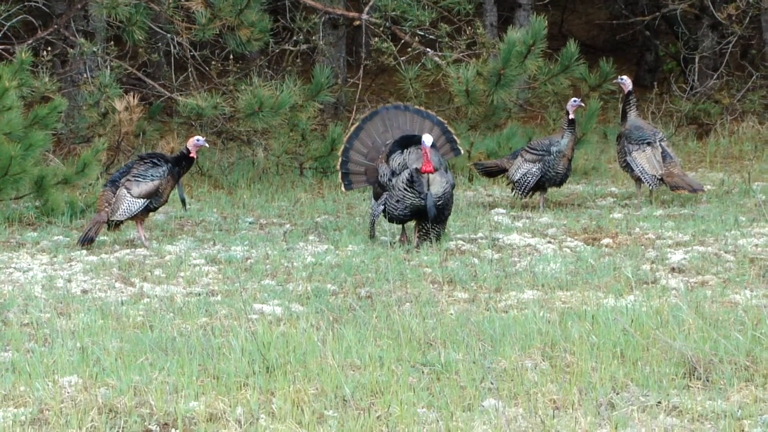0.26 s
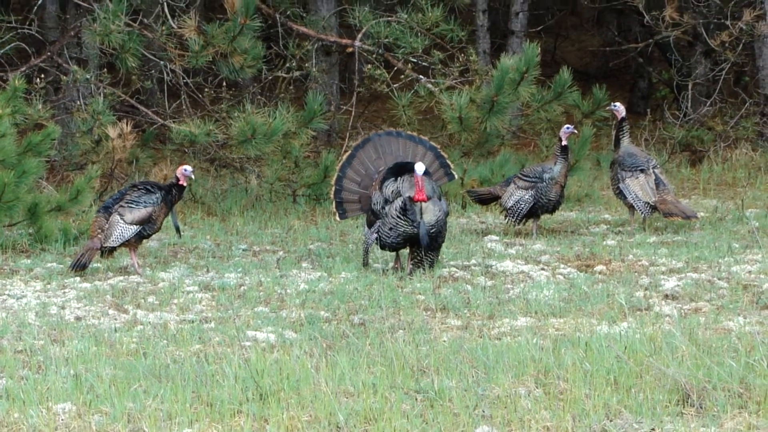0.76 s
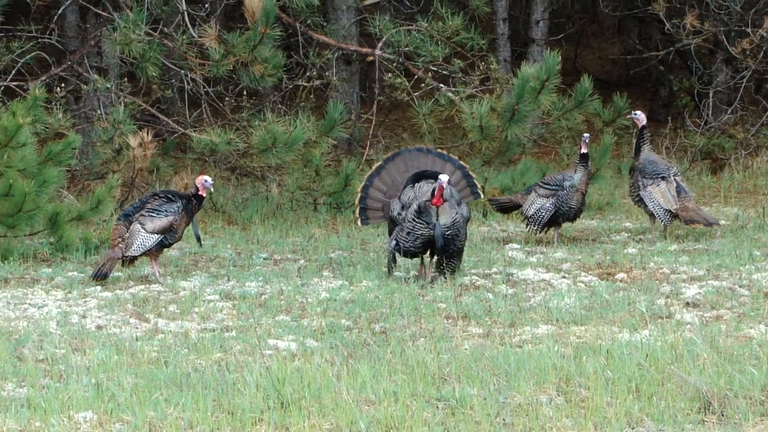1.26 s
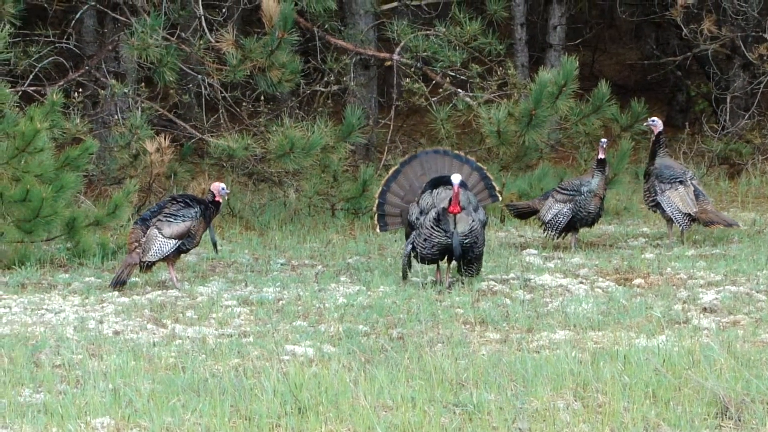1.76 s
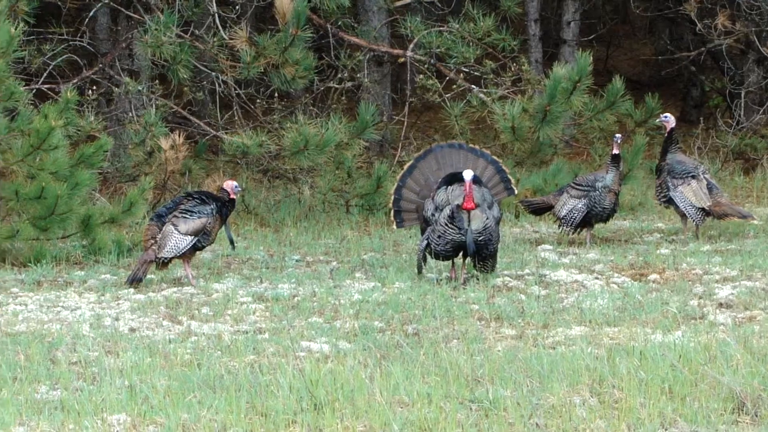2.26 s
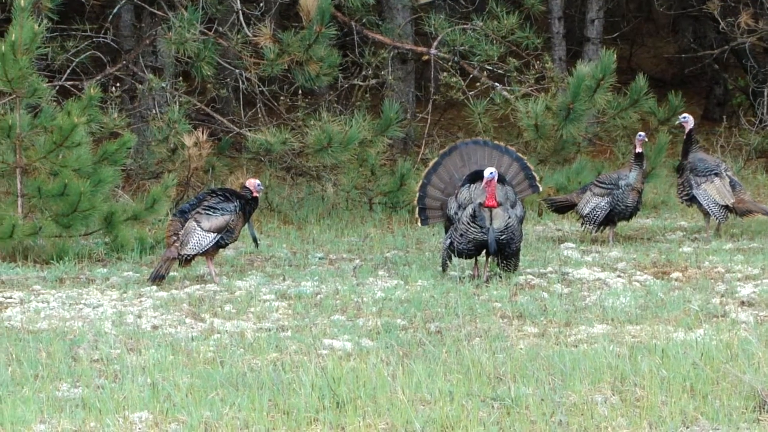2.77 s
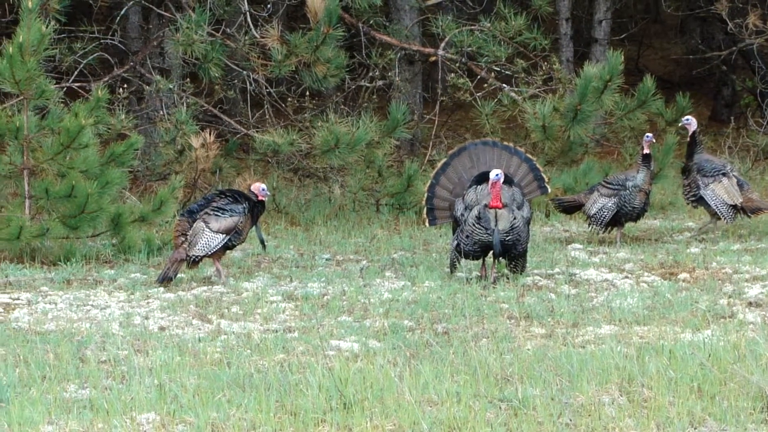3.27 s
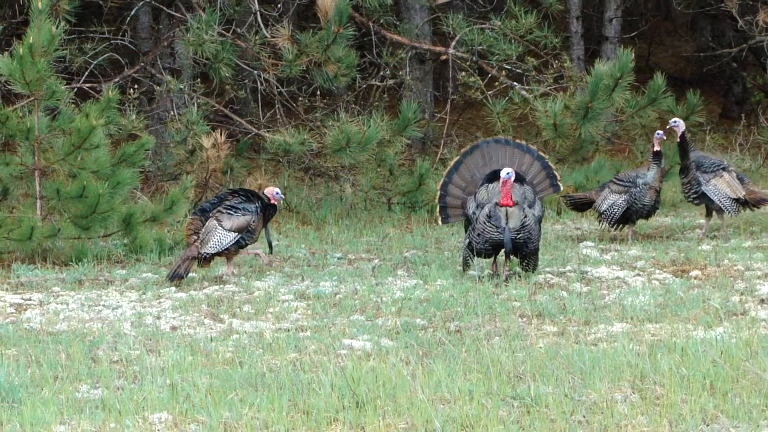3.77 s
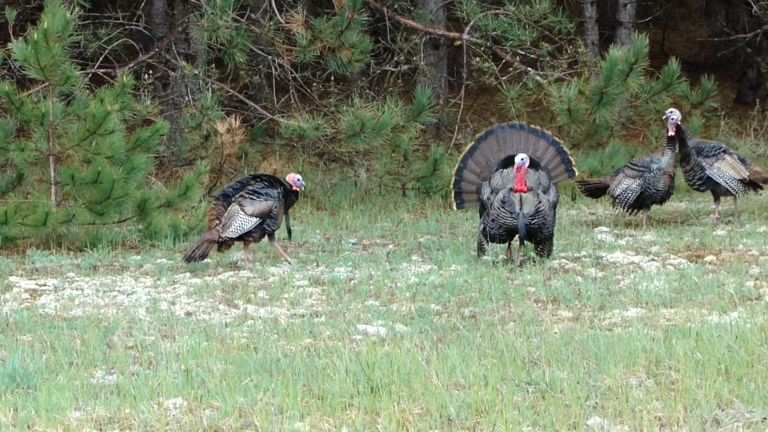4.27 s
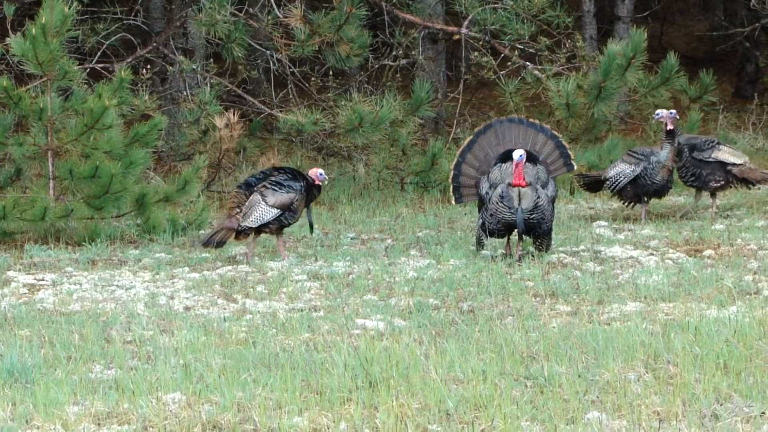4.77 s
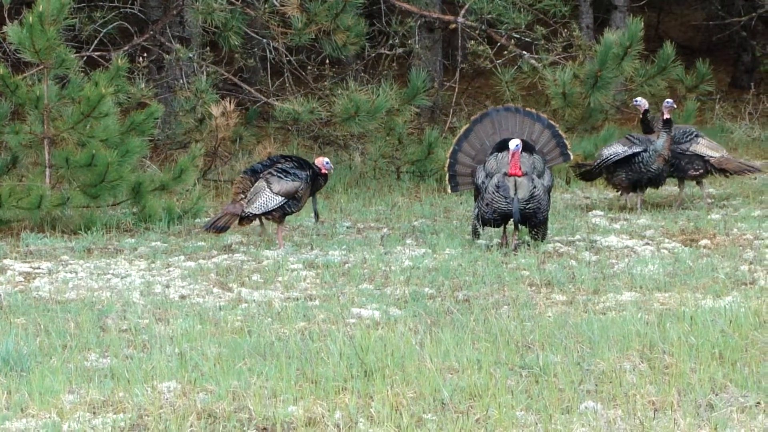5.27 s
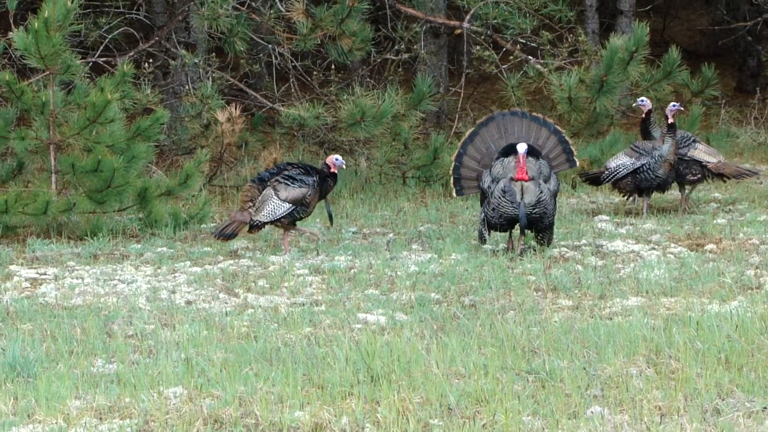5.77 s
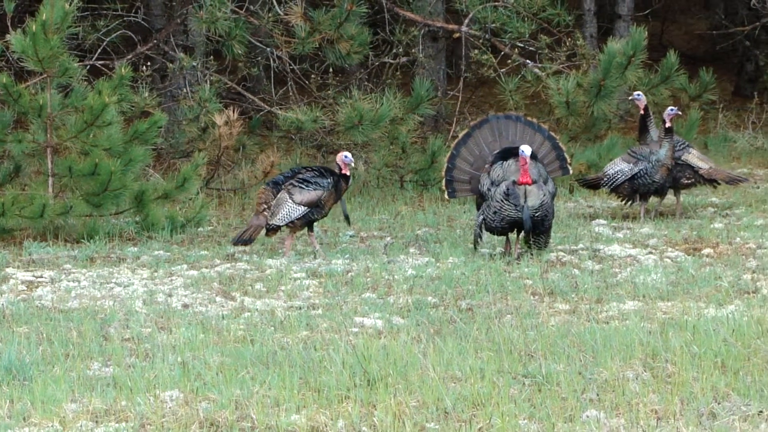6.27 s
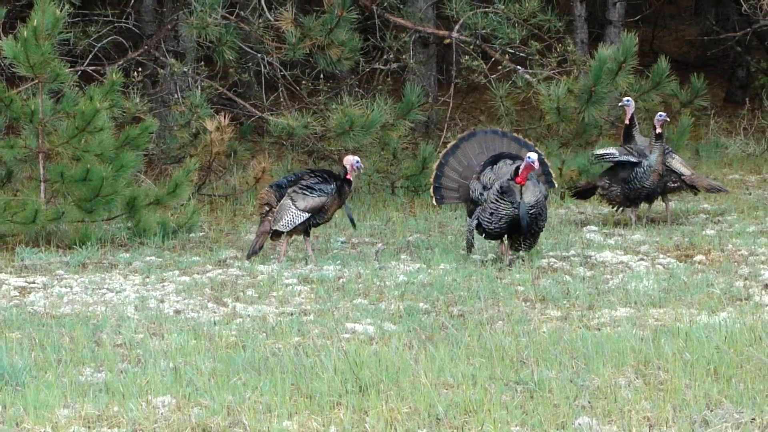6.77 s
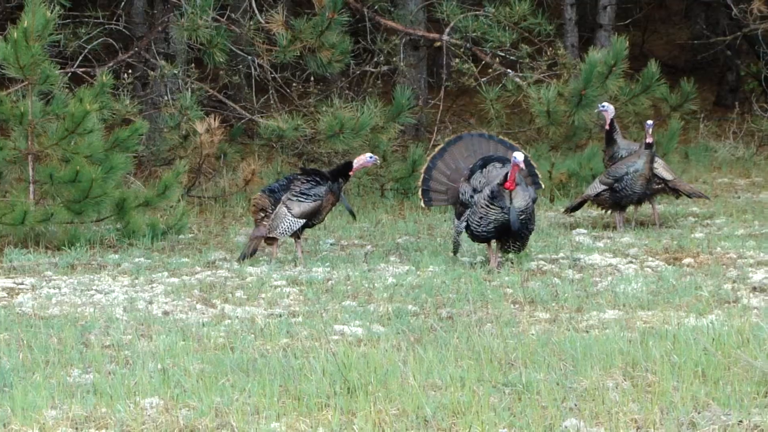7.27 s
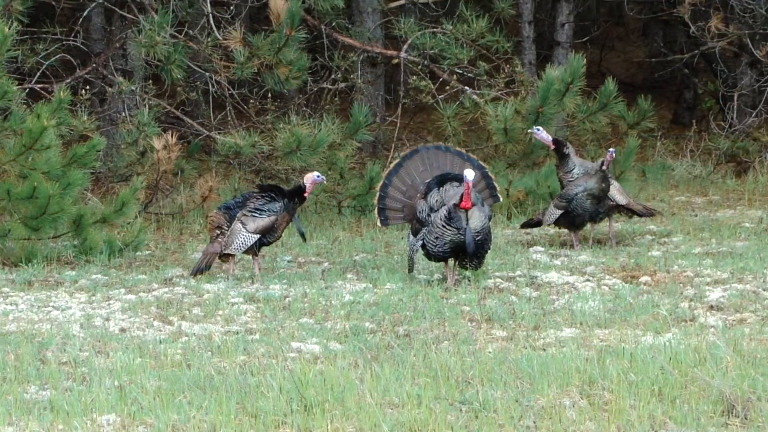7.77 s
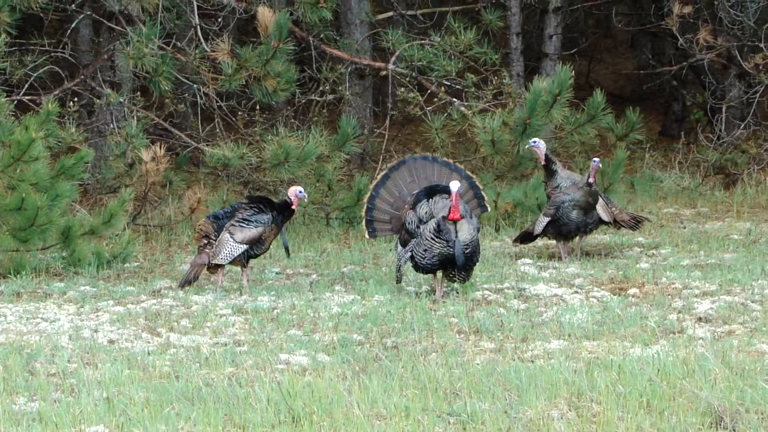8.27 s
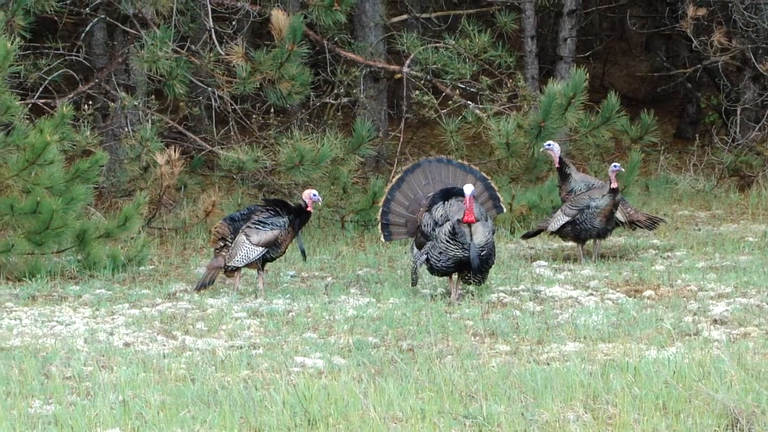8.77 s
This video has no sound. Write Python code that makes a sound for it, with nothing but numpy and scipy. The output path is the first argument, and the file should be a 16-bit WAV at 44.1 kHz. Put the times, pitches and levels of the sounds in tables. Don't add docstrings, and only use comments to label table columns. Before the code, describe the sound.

Wild turkeys outdoors: rattling gobbles and distant raspy yelps, small ticks, then sharp close hen cuts answered by a long rolling gobble.

```python
import sys
import numpy as np
from scipy import signal
from scipy.fft import rfft, irfft, next_fast_len
from scipy.io import wavfile
from scipy.ndimage import uniform_filter1d

SR = 44100
rng = np.random.default_rng(int(sys.argv[2]) if len(sys.argv) > 2 else 0)


def boost(x):
    u = np.asarray(x, float) / 20
    return 10 ** u


def transcribe(u):
    v = np.clip(np.atleast_2d(u).T, -1, 1)
    q = np.round(v * 32767).astype(np.int16)
    wavfile.write(sys.argv[1], SR, q)


N = 398223

# frequency_hz, density_db
AIR_COLOUR = [(24, -12), (40, -17), (64, -26.5), (140, -16), (236, -5.5), (388, -8), (426, -2), (458, -8.5),
              (847, -8), (1050, -11.5), (4770, -30.5), (11400, -45), (14900, -63), (22000, -120)]
# time_s, level_db
AIR_SWELL = [(0, 3), (3.9, 2.5), (4.6, 3), (5.3, 3), (9, 3.5)]
AIR_DB = -43.5
HUM_HZ, HUM_DB = 427, -55

# frequency_hz, left_lead_rad
PORT_PHASE = [(60, -.05), (350, -.35), (780, -.9), (1210, -1.8), (1700, -1.5), (2500, -2.1), (4200, -2.6),
              (5500, -3.4), (7000, -4.2), (8400, -4.7), (11200, -5.5)]
# frequency_hz, left_minus_right_db
PORT_DB = [(60, -9), (110, 2), (190, -1.5), (340, 7), (610, 0), (1080, -3.5), (1940, -2.5), (3450, -3.5),
           (6160, -4), (11000, -12.5), (13000, -19)]

# centre_hz, width_hz, level_db
TOM_THROAT = [(868, 273, -3.5), (1308, 360, -8.5), (2410, 310, -0.5), (3174, 274, -1.5), (3960, 880, -3),
              (5250, 520, -24)]
# centre_hz, width_hz, level_db
TOM_BREATH = [(5130, 640, 18), (8350, 2540, -9)]
# start_s, length_s, peak_db, top_pitch_hz, share_above_split_db
COOS = [
    (.085, .095, -47.5, 759, -12),
    (.375, .07, -33, 787, -3),
]
BARKS = [
    (.952, .048, -21.5, 550, 2),
    (1.022, 0.0552, -23, 739, -4.5),
    (1.54, 0.018, -40.5, 776, -9),
]
WARBLE = [(1.175, 0.03, -27.5, 620, -1.5), (1.222, .03, -40, 573, 2), (1.245, 0.046, -25.5, 656, 3),
          (1.345, 0.057, -26, 623, 1), (1.425, 0.064, -22.5, 650.4, 14), (6.635, 0.028, -28, 562, -3),
          (6.695, .06, -27.5, 665, -1)]
ARCHED = [(6.407, 0.048, -17.5, 692, 0), (6.796, .052, -22, 730, 3), (6.88, .065, -20.5, 784, -1.5),
          (6.989, 0.065, -30, 605, -4.5), (7.27, 0.0364, -27, 575, -1)]
SWELLING = [
    (7.342, .1, -18, 703.4, 0),
    (7.915, .065, -23.5, 656, -0.69),
]
HOARSE = [(6.85, 0.03, -29, 536, -5), (7.44, 0.053, -32.5, 586, -6), (7.975, 0.046, -28.5, 651, -3),
          (8.035, 0.0335, -30.5, 673, -5.5), (8.129, .06, -30, 604, -1.5)]
FALLING = [
    (8.205, 0.078, -21.5, 677, 0),
]
STEADY = [(7.04, 0.036, -21.5, 787, -12.5), (7.07, 0.041, -29, 812, -7.5), (7.115, 0.056, -26.5, 777, -4.5),
          (7.2, .03, -29, 767, -9.5), (7.235, 0.043, -31, 758, -6.5), (7.5, 0.033, -28, 766, -4.5),
          (7.54, 0.052, -23.5, 791, -4), (7.585, 0.076, -22.5, 774.4, -3), (7.685, 0.047, -26, 791, -2),
          (7.725, .038, -20.5, 782, -6), (7.77, 0.067, -23.5, 760, -2.5), (7.855, 0.049, -25.5, 759, -3.5)]
# lower_mouth_hz, upper_mouth_hz, pitch_rise_per_s, pitch_fall_per_s (shares of
# pitch per s of length), peak_place (0 to 1 along the syllable)
VOICE = [
    (1530, 2800, 1.54, 0.85, 0.61),
    (1350, 3540, 1.406, 1.2, 0.69),
    (1960, 3210, .8, 1.26, 0.41),
    (1480, 2160, 2.3, 1.53, 0.593),
    (1190, 2650, 2.1, 2.4, .55),
    (950, 2670, 1.42, 1.66, 0.52),
    (1030, 2560, 1.04, 2.7, 0.253),
    (1150, 2280, 0.91, 0.99, 0.57),
]
VOICE_ROUGH = [.22, .85, .32, .45, .48, .68, .48, .68]
VOICE_UPPER_DB = [0.5, 7, 5.8, 0.65, 7.3, 0.5, 7.2, 1.3]
SYLLABLE_START_DB, SYLLABLE_END_DB, SYLLABLE_ROUND = -10.5, -14, 1.11
PATCHY_DB_PER_ROUGH = 9
# time_s, peak_db,
# pitch_hz
GULP = [(1.1796, -31, 1070), (1.229, -25, 1040), (1.5472, -33, 966), (1.699, -23, 1042),
        (6.6399, -23.5, 1030), (6.6882, -23.5, 980), (6.856, -38, 1030), (6.8836, -24.5, 988),
        (7.052, -24.5, 790), (7.346, -27.5, 842), (7.385, -18, 1372), (7.4, -17.5, 1026),
        (7.61, -21.5, 1043), (7.919, -29, 1100), (8.2108, -20, 1000), (8.255, -23, 1030)]

# start_s, length_s, level_db, pitch_hz, clear_whistle_s (below 0: already dull rasp)
YELP = [(0.427, 0.061, -35, 1073, -.09), (0.659, 0.12, -32, 1107, 0.0098), (.94, 0.114, -34.5, 1100, -.04),
        (1.281, .12, -31.5, 1024, -0.056), (1.414, 0.026, -26, 1000, 0.02),
        (1.624, .138, -30.5, 1074, 0.011), (1.973, .126, -31.5, 1088, 0.029),
        (2.319, 0.13, -31.5, 1097, 0.025), (2.666, 0.126, -32.5, 1091, 0.0393),
        (3.036, 0.12, -34, 1126, 0.042), (3.443, .13, -33.5, 1129, 0.046),
        (3.824, 0.14, -34.5, 1104, 0.018)]
# centre_hz, width_hz, level_db
FAR_THROAT = [(730, 99, -16), (1038, 232, -3), (1664, 170, -5.5), (2200, 50, -11), (2694, 400, -9),
              (3800, 450, -19.5)]
YELP_ATTACK_S, YELP_START_DB, YELP_SAG_DB_PER_S, YELP_SAG_HZ_PER_S = 0.017, -3, 17, 391
WHISTLE_HIGH_DB, RASP_HIGH_DB, RASP_DULLS_DB_PER_S = -4, -2.5, 62
WHISTLE_ARCH_PER_S, YELP_PATCHY_DB = .9, 2.5
RASP_FLUTTER_DB, RASP_FLUTTER_HZ = 3, 45

# time_s, peak_db, centre_hz, ring_s
TICK = [(2.828, -33.5, 3540, 0.021), (4.3172, -26.5, 9500, 0.0062), (4.8, -46, 10400, 0.01),
        (4.4268, -29.5, 4200, 0.019), (4.988, -17.5, 2200, 0.032), (5.163, -18.5, 1280, 0.018),
        (5.416, -17, 1350, 0.018), (5.686, -27, 1610, 0.021), (5.944, -28.5, 1800, 0.057),
        (6.178, -23.5, 1530, 0.03), (6.209, -26, 2400, 0.02), (8.346, -24.5, 2020, 0.02)]

# start_s, chip_count, level_db
CHIP = [
    (3.672, 2, -56),
    (4.494, 6, -56),
]
CHIP_GAP_S = .0708

# start_s, whistle_length_s, pitch_hz, level_db, low_pulse_level_db
CUT = [
    (5.005, 0.012, 950, -13.5, -15),
    (5.27, 0.027, 742, -12.5, -30.5),
    (5.515, 0.02, 1118, -12, -15),
    (5.752, .025, 1134, -13, -15.5),
    (6.025, 0.024, 1190, -13.5, -27.5),
    (6.266, 0.033, 1200, -13.5, -26),
    (6.497, 0.035, 1227, -13, -25.5),
]
# centre_hz, width_hz, level_db
NEAR_THROAT = [(352, 690, -11), (1000, 424, -4), (1444, 440, 4), (2310, 300, 4.5), (2856, 160, 4.5),
               (3057, 560, 2.5), (4570, 1300, -21)]
# centre_hz, width_hz, level_db
NEAR_HISS = [(4630, 1120, 6.5), (6240, 1300, -4.5), (7180, 610, -11), (9500, 910, 0.5)]
# time_s, peak_db, pitch_hz
POP = [
    (5.0, -18.5, 913),
    (5.252, -14.5, 1460),
    (5.507, -9.5, 1472),
    (5.7449, -8, 1464),
    (6.0176, -7.5, 1505),
    (6.2561, -9, 1576),
    (6.4925, -6.5, 1560),
]
# start_s, length_s, pitch_hz, end_pitch_hz, level_db
LEAD_IN = [
    (5.262, 0.0127, 993, 960, -14),
    (6.479, 0.024, 884, 1390, -32.5),
]
CUT_SAG_DB_PER_S = 252
CUT_FALL, CUT_FALL_CURVE = 0.0926, 1.35
GROWL_HZ, GROWL_FALL_PER_S, GROWL_SAG_DB_PER_S, GROWL_END_DB = 366, 1.5, 162, -61.5
GROWL_HOLD_S, GROWL_FADE_S, GROWL_PATCHY_DB = 0.014, 0.047, 4
POP_FALL_PER_S = 9.5

BLUR_HZ = 4300


def curve(table, hz):
    f, v = np.transpose(table)
    return np.interp(np.log(hz + 1), np.log(f + 1), v)


def shape(x, response):
    n = next_fast_len(x.shape[-1] + 512)
    hz = np.arange(n // 2 + 1) * SR / n
    return irfft(rfft(x, n) * response(hz), n)[..., :x.shape[-1]]


def throat(hz, modes):
    hz = hz + 1e-3
    ringing = sum(boost(db) / (1 + 1j * (hz - f * f / hz) / width) ** 2 for f, width, db in modes)
    return ringing / (1 + (450 / hz) ** 4)


def wobble(n, hz):
    k = max(int(SR / hz), 1)
    x = rng.standard_normal(n + 4 * k)
    x = uniform_filter1d(uniform_filter1d(x, k), k)[2 * k:2 * k + n]
    return x * np.sqrt(1.5 * k)


def unit(x):
    return x / np.sqrt(np.mean(x ** 2) + 1e-18)


def add(out, x, s):
    i = int(s * SR)
    out[i:i + len(x)] += x[:len(out) - i]


def buzz(hz, rough, modes, split_hz=None, high_db=None, jitter=.05, shimmer_db=5, patchy=4):
    n = len(hz)
    hz = hz * (1 + jitter * rough ** 2 * wobble(n, 260))
    order = np.arange(1, int(7000 / hz.min()))[:, None]
    patches = boost(patchy * np.array([wobble(n, 62.3) for _ in order]))
    gain = throat(order * hz, modes) / (1 + (order * hz / BLUR_HZ) ** 6) * patches
    turning = np.exp(2j * np.pi * order * np.cumsum(hz) / SR)
    tone = (gain * turning).imag * boost(shimmer_db * rough * wobble(n, 136))
    noise = rng.standard_normal(n)
    parts = []
    for side in ([1, -1] if split_hz else [0]):
        weight = lambda f: 1 / (1 + (f / (split_hz or 1)) ** (8 * side))
        w = weight(order * hz)
        clear = (tone * w).sum(0) / np.sqrt((abs(gain * w) ** 2).sum(0) / 2)
        rasp = unit(shape(noise, lambda f: throat(f, modes) * weight(f)))
        parts.append(np.sqrt(1 - rough ** 2) * clear + rough * rasp)
    if not split_hz:
        return parts[0]
    high = np.minimum(boost(high_db), .97)
    return np.sqrt(1 - high ** 2) * parts[0] + high * parts[1]


def columns(rows, fade_s=0.011):
    s, db, *rest = np.transpose(rows)
    t = np.arange(s[0], s[-1], 1 / SR)
    to_end = np.minimum(t - s[0], s[-1] - t)
    fade = np.sin(np.pi / 2 * np.clip(to_end / fade_s, 0, 1))
    gain = fade * boost(uniform_filter1d(np.interp(t, s, db), 300))
    return t, gain, *(np.interp(t, s, c) for c in rest)


def ports(x):
    half = lambda f: boost(curve(PORT_DB, f) / 2) * np.exp(.5j * curve(PORT_PHASE, f))
    return np.array([shape(x, half), shape(x, lambda f: 1 / half(f))])


def air():
    noise = shape(rng.standard_normal((3, N)), lambda f: boost(curve(AIR_COLOUR, f)))
    shared = ports(noise[0])
    separate = shape(noise[1:], lambda f: (f + 60) / (f + 400))
    swell_db = np.interp(np.arange(N) / SR, *np.transpose(AIR_SWELL)) + 0.93 * wobble(N, 3.6)
    bed = unit(0.57 * shared + 0.84 * separate) * boost(AIR_DB + swell_db)
    hum = np.sin(2 * np.pi * np.cumsum(HUM_HZ + 1.2 * wobble(N, 5)) / SR)
    hum = hum * boost(HUM_DB + 1.5 * wobble(N, 6))
    return bed + ports(hum)


def toms():
    out = np.zeros(N)
    voices = [COOS, BARKS, WARBLE, ARCHED, SWELLING, HOARSE, FALLING, STEADY]
    for table, voice, up_db, rough in zip(voices, VOICE, VOICE_UPPER_DB, VOICE_ROUGH):
        low_hz, up_hz, rise, fall, peak = voice
        modes = TOM_THROAT + [(low_hz, 350, 0), (up_hz, 480, up_db)]
        for s, length, db, top_hz, high_db in table:
            rows = [(s, db, -1), (s + peak * length, db, 0), (s + length, db, 1)]
            t, gain, place = columns(rows, 0.0035)
            end_db = np.where(place < 0, SYLLABLE_START_DB, SYLLABLE_END_DB)
            gain = gain * boost(end_db * abs(place) ** SYLLABLE_ROUND)
            slack = np.where(place < 0, rise, fall) * length * np.sin(np.pi / 2 * place) ** 2
            note = buzz(top_hz * (1 - slack), rough, modes, 1570, high_db, jitter=0.074,
                        patchy=PATCHY_DB_PER_ROUGH * rough)
            add(out, gain * note, s)
    out += boost(-21) * shape(abs(out) * rng.standard_normal(N), lambda f: throat(f, TOM_BREATH))
    t = np.arange(0, .03, 1 / SR)
    for s, db, hz in GULP:
        pitch = hz * (1 + 0.049 * wobble(len(t), 117))
        gulp = np.hanning(len(t)) ** 0.81 * np.sin(2 * np.pi * np.cumsum(pitch) / SR)
        add(out, boost(db) * gulp, s - .006)
    return out


def far_hen():
    out = np.zeros(N)
    for s, length, db, hz, clear in YELP:
        t, gain = columns([(s, db + YELP_START_DB), (s + YELP_ATTACK_S, db),
                           (s + length, db - YELP_SAG_DB_PER_S * length)])
        broken = np.clip((t - s - clear) / .012 + .6 + (clear <= 0), 0, 1)
        rough = np.clip(broken, .12, .93)
        high_db = WHISTLE_HIGH_DB + broken * (RASP_HIGH_DB - WHISTLE_HIGH_DB)
        high_db = high_db - RASP_DULLS_DB_PER_S * np.maximum(t - s - clear, 0)
        hz = (hz - YELP_SAG_HZ_PER_S * (t - s)) * (1 + 0.0062 * wobble(len(t), 72))
        through = np.clip((t - s) / (max(clear, 0) + 0.0016), 0, 1)
        hz *= 1 + WHISTLE_ARCH_PER_S * clear * np.sin(np.pi * through ** 0.82) ** 2
        gain = gain * boost(RASP_FLUTTER_DB * broken * np.tanh(wobble(len(t), RASP_FLUTTER_HZ)))
        note = buzz(hz, rough, FAR_THROAT, 1226, high_db, jitter=0.029, patchy=YELP_PATCHY_DB)
        add(out, gain * note, s)
    return out


def ticks():
    out = np.zeros(N)
    t = np.arange(0, .05, 1 / SR)
    for s, db, hz, ring in TICK:
        noise = unit(shape(rng.standard_normal(len(t)), lambda f: throat(f, [(hz, .5 * hz, 0)])))
        add(out, boost(db) * noise * np.exp(-np.log(1000) * t / ring), s)
    return out


def songbird():
    out = np.zeros(N)
    t = np.arange(0, .022, 1 / SR)
    pitch = 4000 + 1300 * np.sqrt(t / t[-1])
    chip = np.sin(2 * np.pi * np.cumsum(pitch) / SR) * np.hanning(len(t))
    for s, count, db in CHIP:
        for k in range(count):
            add(out, boost(db) * chip, s + k * CHIP_GAP_S)
    return out


def near_hen():
    out = np.zeros(N)
    for s, length, hz0, db, growl_db in CUT:
        t, gain = columns([(s, db), (s + length, db - CUT_SAG_DB_PER_S * length)], 0.0018)
        pitch = hz0 * (1 - CUT_FALL * ((t - s) / length) ** CUT_FALL_CURVE)
        add(out, gain * buzz(pitch, .35, NEAR_THROAT, patchy=2.5), s)
        s = s + length - .002
        t, gain = columns([(s, growl_db),
                           (s + GROWL_HOLD_S, growl_db - GROWL_SAG_DB_PER_S * GROWL_HOLD_S),
                           (s + GROWL_HOLD_S + GROWL_FADE_S, GROWL_END_DB)], 0.0037)
        rough = np.linspace(.2, .9, len(t))
        pitch = GROWL_HZ * (1 - GROWL_FALL_PER_S * (t - s))
        add(out, gain * buzz(pitch, rough, NEAR_THROAT, patchy=GROWL_PATCHY_DB), s)
    for s, length, hz0, hz1, db in LEAD_IN:
        t, gain, hz = columns([(s, db, hz0), (s + length, db, hz1)], 0.0037)
        add(out, gain * buzz(hz, .35, NEAR_THROAT, patchy=2.5), s)
    out += boost(-10) * shape(abs(out) * rng.standard_normal(N), lambda f: throat(f, NEAR_HISS))
    t = np.arange(0, .09, 1 / SR)
    swell = lambda rise: (t / rise) * np.exp(1 - t / rise)
    for s, db, hz in POP:
        pitch = hz * (1 + 0.296 * np.exp(-t / 0.00221) - POP_FALL_PER_S * (t - .004))
        ring = np.sin(2 * np.pi * np.cumsum(pitch) / SR)
        crack = shape(rng.standard_normal(len(t)), lambda f: throat(f, NEAR_THROAT))
        hiss = unit(shape(rng.standard_normal(len(t)), lambda f: throat(f, NEAR_HISS)))
        hiss = hiss * boost(1.66 * wobble(len(t), 405))
        pop = boost(db) * swell(0.0038) ** 3 * (ring + boost(-3) * crack)
        puff = boost(-22.5 + 1.07 * db) * swell(0.013) * np.exp(-(t / 0.072) ** 4) * hiss
        add(out, pop + puff, s)
    return out


def trees(x, t60, db):
    t = np.arange(0, 1.2 * t60, 1 / SR)
    tail = rng.standard_normal((2, len(t))) * np.exp(-np.log(1000) * t / t60)
    tail = tail * np.clip((t - .01) / 0.019, 0, 1)
    tail = shape(tail, lambda f: throat(f, [(1100, 2140, 8.5), (3090, 3500, 1.5)]))
    tail = tail / np.sqrt((tail ** 2).sum(1, keepdims=True))
    return boost(db) * signal.fftconvolve(x[None], tail, axes=1)[:, :N]


def scene():
    flock, far, near = toms(), far_hen(), near_hen()
    birds = boost(5.5) * flock + boost(6.0) * far + boost(7.0) * near
    direct = ports(birds + ticks()) + songbird()
    echoes = trees(flock, 0.36, -14.5) + trees(far, 0.99, -14) + trees(near, 0.31, -34.5)
    return direct + echoes + air()


def low_pass(x):
    return signal.sosfilt(signal.butter(12, 11590, fs=SR, output="sos"), x)


def record(dry):
    smooth = 1 / (.12 * SR)
    loud = signal.lfilter([smooth], [1, smooth - 1], abs(dry).max(0))
    x = np.clip(dry / (1 + 2.0 * loud), -1, 1)
    x = np.clip(shape(x, lambda f: f ** 2 / (f ** 2 + 70 ** 2)), -1, 1)
    return low_pass(x)


dry = scene()
out = record(dry)
transcribe(out)
```